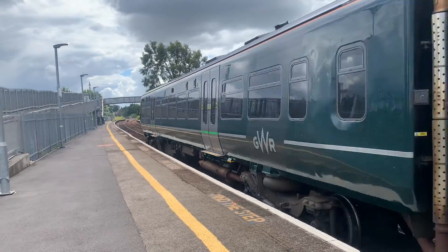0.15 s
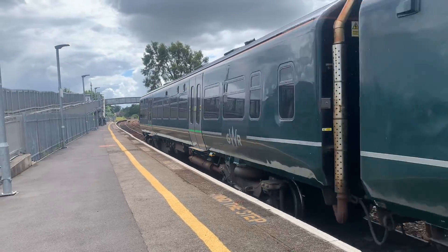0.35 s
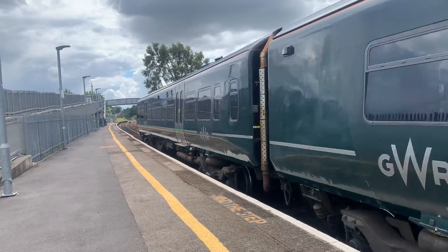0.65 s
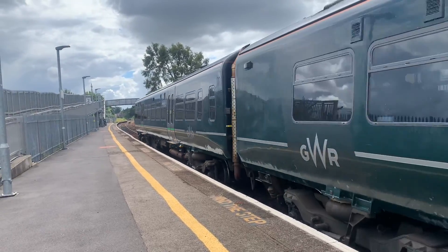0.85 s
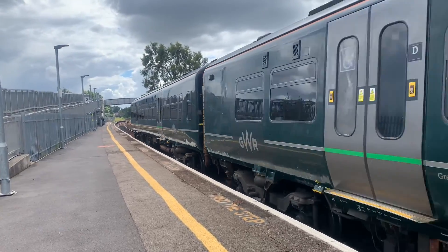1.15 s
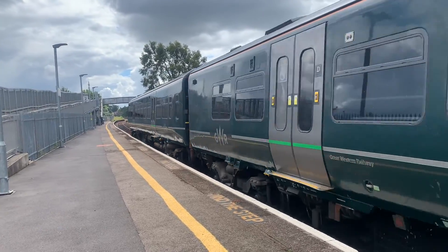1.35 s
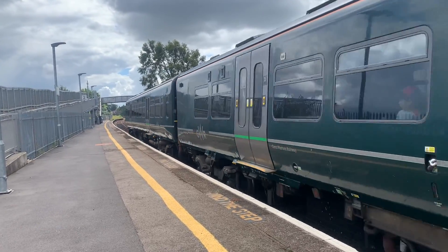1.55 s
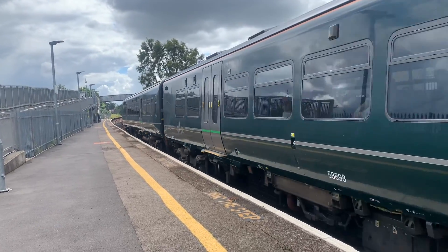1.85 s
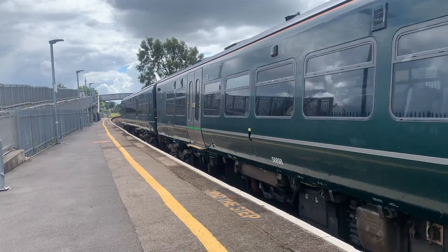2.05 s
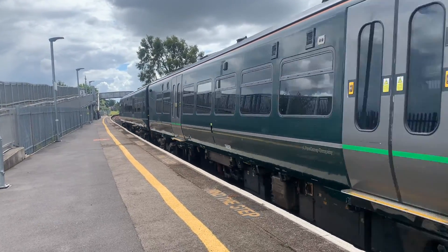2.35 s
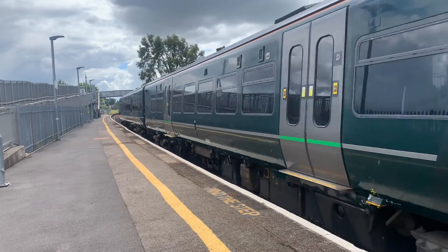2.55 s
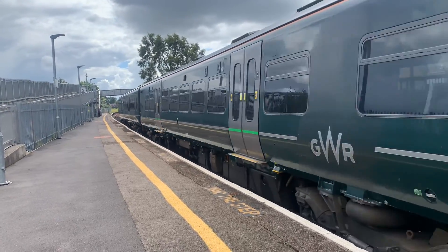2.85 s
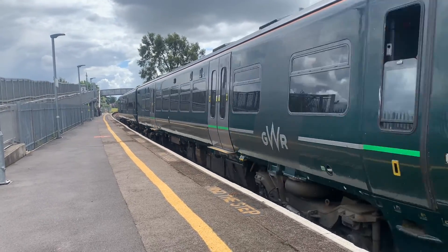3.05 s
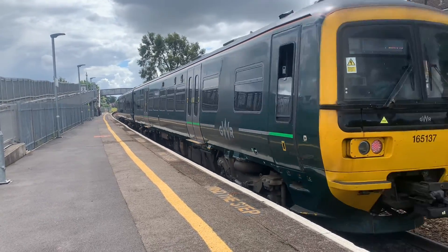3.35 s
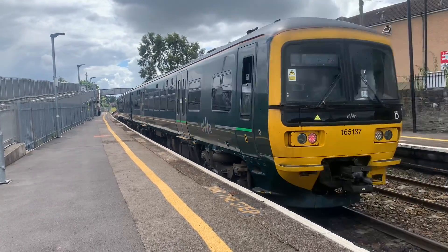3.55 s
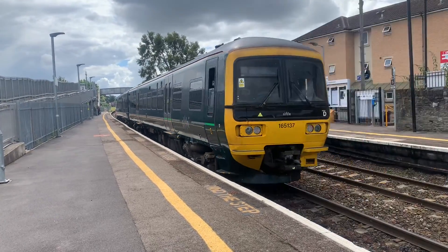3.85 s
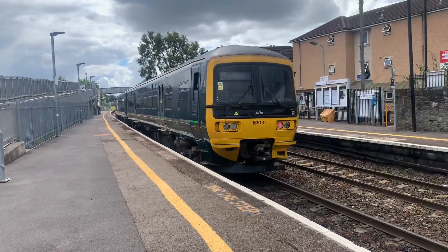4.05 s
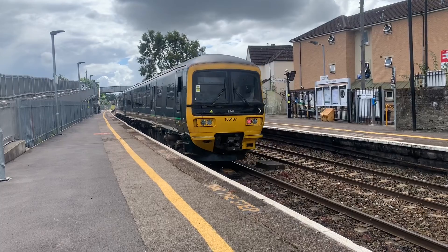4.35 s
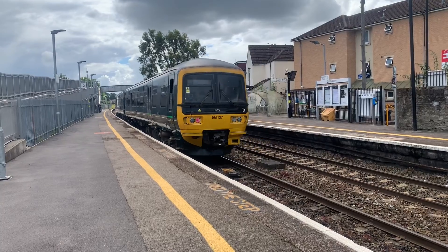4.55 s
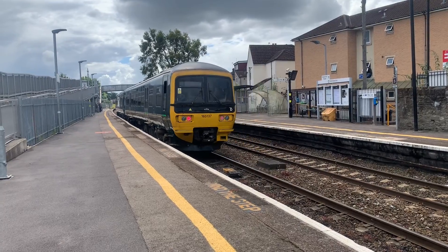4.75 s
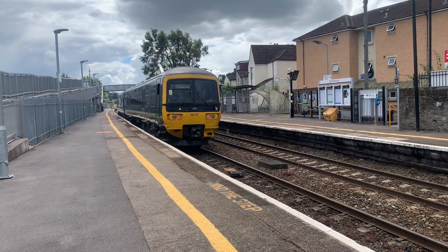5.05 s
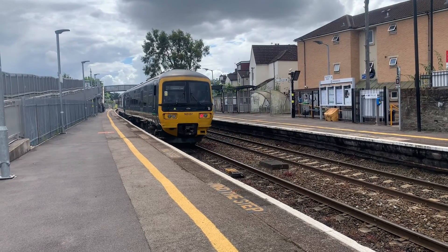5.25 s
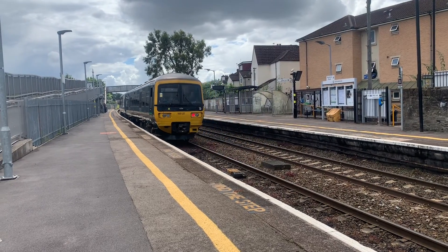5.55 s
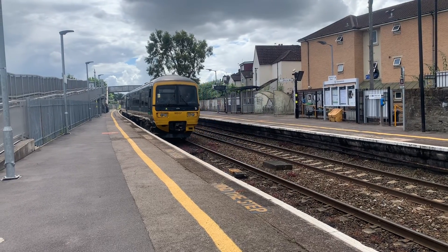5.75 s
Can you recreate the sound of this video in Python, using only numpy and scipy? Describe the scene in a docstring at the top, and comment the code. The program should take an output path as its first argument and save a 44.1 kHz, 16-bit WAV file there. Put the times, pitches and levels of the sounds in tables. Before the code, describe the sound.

About six seconds, outdoors on a station platform, stereo microphones very near the track. The train is already alongside at the start: a deep diesel drone around 40 and 80 Hz, beating slowly about every one and a half seconds, over low rumble, churning air and broadband wheel roar. From 0.8 s knocks and resonant wheel noise appear; at about 1.15 s cooling air roars, throbbing some forty times a second, with a dull thump and bright gritty spits. Around 1.3-1.6 s it peaks with a hard, rapid metallic clatter, its ring sinking in pitch, and a low slap of air. Sparser ticks continue to 2.7 s, with dull thumps near 2.35 and 2.6 s. A soft gust follows at 3 s. The train then recedes, drone and rolling noise steadily weaker and duller, with small wind bumps at 4.6, 5.0 and 5.3 s and a low gust near the end.

```python
"""A station platform: a diesel multiple unit runs through, close on the right of two microphones, and recedes.
Six-cylinder underfloor engines drone as beating partials; filtered noise gives rumble and wheel roar.
The last engine passes with throbbing cooling air and a hard clatter once a crank turn; running gear spits and thumps.
Sources swell and fade with distance; the air dulls the receding train and its wake buffets the microphones.
Table levels are those before the microphone ports add their resonance."""
import sys
import numpy as np
from scipy import signal
from scipy.fft import rfft, irfft, next_fast_len
from scipy.io import wavfile
from scipy.ndimage import uniform_filter1d

SR = 44100
rng = np.random.default_rng(int(sys.argv[2]) if len(sys.argv) > 2 else 0)


def unload_wav(signal):
    """Save mono or channel-first audio to the path in sys.argv[1] as 16-bit WAV at rate SR, clipped to [-1, 1]."""
    wavfile.write(
        sys.argv[1],
        SR,
        np.round(np.clip(np.atleast_2d(signal).T, -1, 1) * 32767).astype(np.int16),
    )


N = 259742  # samples
TIME = np.arange(N) / SR
# short-time frames for the two-microphone noise: 1024 samples long, 256 apart
FREQS = np.fft.rfftfreq(1024, 1 / SR)
FRAMES = np.arange(N // 256 + 5) * 256 / SR


def amp(db):
    """Decibels to gain."""
    return 10 ** (np.asarray(db) / 20)


def unit(x):
    """Scales to rms 1."""
    return x / np.sqrt(np.mean(x ** 2) + 1e-20)


def along(rows, t=TIME):
    """Reads a curve at the times t."""
    return np.interp(t, *np.transpose(rows))


def across(rows, hz=FREQS):
    """Reads a spectrum on a log-frequency axis."""
    f, value = np.transpose(rows)
    return np.interp(np.log(hz + 1), np.log(f), value)


def add(mix, s, sound):
    """Mixes a sound in at time s."""
    part = mix[max(round(s * SR), 0):][:len(sound)]
    part += sound[:len(part)]


def sweep(change, t=TIME):
    """A smooth S-shaped move from one value to another."""
    before, after, middle, half = change
    return before + (after - before) * (1 + np.tanh((t - middle) / half)) / 2


def passing(rows):
    """Gain of sources on a straight track: each falls off with distance, differently ahead and behind."""
    power = 0
    for s, db, passing_s, coming_db, going_db in rows:
        # passing_s is the nearest distance divided by the train speed
        doublings = np.log2(np.hypot(1, (TIME - s) / passing_s))
        fall_db = doublings * np.where(TIME < s, coming_db, going_db)
        power = power + amp(db - fall_db) ** 2
    return np.sqrt(power)


def drift(rate_hz):
    """Slow random motion of rms 1: noise with its fast part filtered away."""
    hz = np.fft.rfftfreq(N, 1 / SR)
    slow = rfft(rng.standard_normal(N)) / (1 + (hz / rate_hz) ** 4)
    return unit(irfft(slow, N))


def colour(x, spectrum, ripple_db=0):
    """Filters by a spectrum with steep ends; echoes under the cars cut a fine ripple into it."""
    hz = np.fft.rfftfreq(N, 1 / SR)
    low_end = np.minimum(hz / spectrum[0][0], 1) ** 3
    high_end = np.minimum(spectrum[-1][0] / (hz + 1), 1) ** 3
    ripple = unit(uniform_filter1d(rng.standard_normal(len(hz)), size=130))
    gain = amp(across(spectrum, hz) + ripple_db * ripple) * low_end * high_end
    return irfft(rfft(x) * gain, N)


# likeness of the two microphones for sound spread along the track: f/Hz, likeness (0-1)
SPREAD_LIKENESS = [(30, 0.66), (100, 0.9), (200, 0.85), (400, 0.58), (600, 0.63), (800, 0), (1100, 0.6),
                   (1400, 0.26), (1750, 0.8), (2500, 0), (4000, 0.58), (5000, 0.56), (6500, 0.42)]
# how far the left microphone leads for that sound: f/Hz, phase/rad
SPREAD_PHASE = [(100, 0.5), (250, -0.04), (450, 0.3), (750, 1), (1100, -0.6), (1750, -2.1), (2600, -0.55),
                (3500, -0.5), (4300, 1.6), (5000, 3), (6500, 0)]
# how much louder the left microphone is for that sound: f/Hz, level/dB
SPREAD_LEFT_DB = [(100, -2), (220, -1), (450, -1.8), (750, 0), (1100, 4), (1800, 1), (2600, 3), (4000, -1),
                  (7000, -2.5)]
# lead of the right microphone for the last engine: before/ms, after/ms, midpoint t/s, half duration/s
BEARING_LEAD_MS = (0.334, -0.049, 1.73, 0.44)


def air(direct, patchy_db):
    """White turbulence at two microphones: a share straight from the engine, the rest from all along the track."""
    shape = (3, len(FRAMES), len(FREQS))
    track, other, engine = rng.standard_normal(shape) + 1j * rng.standard_normal(shape)
    same = across(SPREAD_LIKENESS)
    lean = amp(across(SPREAD_LEFT_DB) / 2) * np.exp(.5j * across(SPREAD_PHASE))
    spread_left = track * lean
    spread_right = (same * track + np.sqrt(1 - same ** 2) * other) / lean
    # long waves take longer to bend round the microphones
    detour = 1 + 0.94 / (1 + (FREQS / 750) ** 2)
    lead_s = sweep(BEARING_LEAD_MS, FRAMES)[:, None] / 1000
    turn = np.exp(2j * np.pi * FREQS * detour * lead_s)
    spread, straight = np.array([spread_left, spread_right]), np.array([engine, engine * turn])
    z = np.sqrt(1 - direct) * spread + np.sqrt(direct) * straight
    # uneven patches in time and pitch, shared by both microphones
    patches = uniform_filter1d(rng.standard_normal(track.shape), size=10, axis=0)
    patches = unit(uniform_filter1d(patches, size=9, axis=1))
    z = z * amp(patchy_db * patches)
    noise = signal.istft(z, nperseg=1024, noverlap=768, time_axis=1, freq_axis=2)[1]
    return unit(noise[:, :N])


def ringing(modes):
    """Noise of rms 1 held in a few resonances."""
    hz = np.fft.rfftfreq(N, 1 / SR)
    power = sum(amp(db) ** 2 / (1 + ((hz - f) / width) ** 2) ** 2 for f, width, db in modes)
    noise = air(direct=0.19, patchy_db=3.0)
    return unit(irfft(rfft(noise) * np.sqrt(power), N))


def strike(hz, width_hz, t60, rise):
    """A blow on a cluster of close resonances: narrow noise that rises quickly and dies away."""
    t = np.arange(SR // 2) / SR
    gain = 1 / (1 + ((np.fft.rfftfreq(len(t), 1 / SR) - hz) / width_hz) ** 4)
    ring = irfft(rfft(rng.standard_normal(len(t))) * gain, len(t))
    fade = amp(-60 * t / t60) * (1 - np.exp(-t / rise))
    return unit(ring * fade) * np.sqrt(np.mean(fade ** 2))


# crankshaft speed as heard: t/s, f/Hz (turns a second)
CRANK_SPEED = [(0, 39.7), (1.2, 39.5), (1.8, 39.25), (3, 39.15), (5.89, 39.15)]


def crank_turns():
    """Crank angle in turns: the running sum of its speed, zero at 1.4535 s."""
    turns = np.cumsum(along(CRANK_SPEED)) / SR
    return turns - np.interp(1.4535, TIME, turns)


# partials of the exhaust drone: multiple of crank speed, relative level/dB
ENGINE_ORDERS = [(1, -6), (1.5, -8), (2, 0.9), (2.5, -13), (3, -10), (3.5, -20.5), (4.5, -22.5), (5, -19)]
# exhausts going by: t/s nearest, level/dB there, passing time/s, fall/dB per doubling coming, going
EXHAUST_PASSES = [(.25, -24.5, 0.77, -3, 6.95), (2.85, -35.5, 0.9, 5, 5.7)]
# hums of machinery under the cars: t/s abreast, passing time/s, f/Hz, level/dB
HUMS = [(0.4, 0.35, 197, -38), (1.05, 0.3, 171.5, -29.5), (1.3, 0.7, 359, -38.5), (1.3, 0.95, 33.7, -31.5),
        (2.5, 0.2, 319, -38), (2.75, 0.25, 231, -38), (3.4, 0.45, 315, -42.5)]
HUM_DOPPLER = 0.014  # share by which a hum is sharp while coming and flat while going
HUM_FALL_DB = 15  # per doubling of distance
# the beat: first crest, period, and strength of the weaker engine (0-1)
BEAT_CREST_S, BEAT_PERIOD_S, BEAT_SHARE = 0.19, 1.485, 0.27


def wavering_partial(turns):
    """A sine that wavers in level and phase as the paths under the cars change."""
    waver = amp(.3 * drift(3))
    wander = rng.random() + .012 * drift(2)
    return np.sqrt(2) * waver * np.sin(2 * np.pi * (turns + wander))


def drone():
    """Exhaust partials beat slowly, as two engines run slightly apart; machinery hums go by with Doppler shift."""
    turns = crank_turns()
    exhaust = sum(amp(db) * wavering_partial(order * turns) for order, db in ENGINE_ORDERS)
    beat_turns = (TIME - BEAT_CREST_S) / BEAT_PERIOD_S
    beat = abs(1 + BEAT_SHARE * np.exp(2j * np.pi * beat_turns))
    hums = 0
    for s, passing_s, hz, db in HUMS:
        heard_time = TIME - HUM_DOPPLER * np.hypot(TIME - s, passing_s)
        gain = passing([(s, db, passing_s, HUM_FALL_DB, HUM_FALL_DB)])
        hums = hums + gain * wavering_partial(hz * heard_time)
    return passing(EXHAUST_PASSES) * beat * exhaust + hums


# rumble of the cars: f/Hz, relative level/dB
RUMBLE_SPECTRUM = [(25, -14), (35, 4.5), (41, 5), (48, -5), (60, 4.5), (78, -3), (100, -0.5), (135, -1),
                   (235, -5.5), (400, -22.5), (1000, -21.5)]
# fade of the rumble: level/dB before, level/dB after, midpoint t/s, half duration/s
RUMBLE_FADE_DB = (-23.5, -39.5, 3, 2)
RUMBLE_LUMPS_DB, RUMBLE_LUMPS_HZ = 2, 1.46  # rms depth and rate of its random lumps
# wheels rolling on rail: f/Hz, relative level/dB
ROLL_SPECTRUM = [(60, 8), (200, -2), (370, 2), (700, -2.5), (1050, -5), (1400, -9.5), (1750, -5.5),
                 (2200, -8.5), (3100, -15), (4200, -17), (5600, -26), (7500, -26), (9500, -28),
                 (15000, -46)]
# share of rolling noise from the engine's side: before, after, midpoint t/s, half duration/s
ROLL_DIRECT = (0.47, 0.082, 1.83, 0.21)
# resonances of the rails: f/Hz, width/Hz, relative level/dB
RAIL_MODES = [(745, 22, -3), (966, 57, -2.5), (1220, 15, 2.5), (1328, 18, -20), (1675, 39, -3.5),
              (1970, 60, -12)]
RAIL_DB = -13  # against the wheel roar
# the wheels going by: t/s nearest, level/dB there, passing time/s, fall/dB per doubling coming, going
WHEEL_PASS = [(1.68, -28.5, 0.89, 2.7, 6.41)]


def rolling():
    """Low rumble of the cars, the roar of the wheels, and the rails singing faintly under them."""
    direct = sweep(ROLL_DIRECT, FRAMES)[:, None]
    rumble = unit(colour(air(direct, patchy_db=0.6), RUMBLE_SPECTRUM))
    rumble_db = sweep(RUMBLE_FADE_DB) + RUMBLE_LUMPS_DB * drift(RUMBLE_LUMPS_HZ)
    wheels = unit(colour(air(direct, patchy_db=2), ROLL_SPECTRUM, ripple_db=1.1))
    rails = amp(RAIL_DB) * ringing(RAIL_MODES)
    return rumble * amp(rumble_db) + (wheels + rails) * passing(WHEEL_PASS)


# cooling air: f/Hz, relative level/dB
FAN_SPECTRUM = [(80, -36), (170, 0.5), (360, 5.5), (620, -3), (980, 3.5), (1400, -4), (1800, -14),
                (2400, -21), (3100, -30), (4200, -28), (5800, -33.5), (15000, -45)]
# the fan going by: t/s nearest, level/dB there, passing time/s, fall/dB per doubling coming, going
FAN_PASS = [(1.15, -23, 0.33, 5, 8.8)]
# air forced through the radiator grille: f/Hz, relative level/dB
GRILLE_SPECTRUM = [(450, -20), (680, -3), (800, -2), (980, -1), (1150, 2), (1400, -18)]
# the grille going by: t/s nearest, level/dB there, passing time/s, fall/dB per doubling coming, going
GRILLE_PASS = [(1.3, -28.5, 0.08, 11, 11)]


def fan():
    """Cooling air roars mostly from the moving engine, throbs with the crank and surges as the grille goes by."""
    throb = 1 + 0.32 * np.cos(2 * np.pi * (crank_turns() - .25))
    roar = unit(colour(air(direct=0.94, patchy_db=0.0), FAN_SPECTRUM, ripple_db=0.85))
    surge = unit(colour(air(direct=0.59, patchy_db=3), GRILLE_SPECTRUM, ripple_db=6.0))
    return (roar * passing(FAN_PASS) + surge * passing(GRILLE_PASS)) * throb


# bright spits of the running gear: t/s, level/dB, time/s to fall 60 dB
SPITS = [(0.139, -37, 0.16), (1.155, -29, 0.07), (1.255, -28, 0.047), (1.306, -30.5, 0.049),
         (1.406, -30, 0.058), (1.558, -37, 0.072), (1.577, -31, 0.07), (2.042, -32, 0.066)]
# their colour: f/Hz, relative level/dB
SPIT_SPECTRUM = [(2000, -28), (5000, -6), (7000, -7), (9500, -2), (12000, -8), (15500, -8)]
# dull thumps of the bogies: t/s, level/dB, f/Hz, time/s to fall 60 dB
THUMPS = [(1.172, -18, 156, 0.4), (2.344, -20, 133, 0.26), (2.605, -17, 127, 0.14)]


def running_gear():
    """Short gritty noise spits and a few low struck thumps from under the train."""
    spits, thumps, t = np.zeros(N), np.zeros(N), np.arange(SR // 3) / SR
    for s, db, t60 in SPITS:
        add(spits, s, amp(db - 60 * t / t60) * (1 - np.exp(-t / 0.0022)))
    for s, db, hz, t60 in THUMPS:
        add(thumps, s, amp(db) * strike(hz, width_hz=0.22 * hz, t60=t60, rise=0.0057))
    grit = unit(amp(2.5 * drift(700)))
    noise = unit(colour(air(direct=0.28, patchy_db=3.0), SPIT_SPECTRUM))
    return spits * grit * noise + thumps


# air churning under the cars: f/Hz, relative level/dB
CHURN_SPECTRUM = [(85, -8), (130, 0), (175, -2.5), (225, -2), (280, -12), (400, -12), (700, -24)]
# churning spots going by: t/s nearest, level/dB there, passing time/s, fall/dB per doubling coming, going
CHURN_PASSES = [(0.22, -26.5, 0.09, 14, 14), (0.95, -30, 0.14, 14, 12), (2.31, -27, 0.12, 12, 18),
                (2.64, -29.5, 0.07, 18, 12)]


def slipstream():
    """Rough low churning of the air dragged along by the bogies and the boxes under the floor."""
    churn = unit(colour(air(direct=0.5, patchy_db=3), CHURN_SPECTRUM))
    return passing(CHURN_PASSES) * churn


RATTLE_PER_S, RATTLE_SPAN = 1000, 1.4  # mean clicks a second; ratio of their spread above and below the pitch


def rattle(hz, t60):
    """Chatter: a fast run of tiny band-passed clicks round one pitch, uneven in size and dying away."""
    t = np.arange(SR // 2) / SR
    clicks = (rng.random(len(t)) < RATTLE_PER_S / SR) * rng.uniform(-0.39, 1, len(t))
    clicks[0] = 1
    band = (hz / RATTLE_SPAN, hz * RATTLE_SPAN)
    tick = signal.butter(2, band, "bandpass", fs=SR, output="sos")
    run = signal.sosfilt(tick, clicks * amp(-60 * t / t60))
    return run / abs(run).max()


# short knocks and clicks heard as the train passes:
# t/s, reference level/dB, ring f/Hz, ring width/Hz, time/s to fall 60 dB
KNOCKS = [(0.857, -19, 1000, 550, 0.022), (1.031, -23, 2200, 300, 0.066), (1.076, -33, 5080, 220, 0.093),
          (1.100, -25, 5070, 200, .11), (1.128, -32, 5000, 120, .09), (1.153, -30, 4710, 130, .11),
          (1.3025, -17, 3460, 250, 0.045), (1.328, -29, 4410, 250, .09), (1.354, -29, 6400, 400, .06),
          (1.378, -26, 4050, 650, .06), (1.405, -29, 3960, 800, 0.06), (1.431, -27, 3800, 500, .06),
          (1.453, -17, 3880, 850, 0.065), (1.4795, -21, 4160, 600, .085), (1.504, -19, 3900, 500, 0.065),
          (1.531, -19, 3700, 550, 0.049), (1.609, -27, 4370, 180, 0.1), (1.764, -29, 1900, 450, 0.036),
          (1.914, -24, 3530, 150, 0.054), (1.987, -31, 4610, 220, .08), (2.016, -32, 4700, 120, 0.074),
          (2.088, -35, 4500, 180, .06), (2.167, -35, 4690, 150, 0.066), (2.191, -37, 4380, 120, .07),
          (2.216, -26, 4140, 550, .09), (2.345, -31, 4050, 300, 0.07), (2.425, -28, 4040, 300, .08),
          (2.578, -28, 4620, 200, 0.15), (2.678, -36, 3600, 200, .06), (2.729, -28, 3750, 500, .06)]
KNOCK_RING_DB, RATTLE_DB = -11, -5  # ring and chatter against the reference level
KNOCK_RIGHT_DB = -1  # right microphone against the left


def knocks():
    """Short knocks and clicks as the train passes: a rattle of ticks with a brief ring of narrow noise."""
    left, right = np.zeros((2, N))
    for s, db, hz, width_hz, t60 in KNOCKS:
        ring = amp(db + KNOCK_RING_DB) * strike(hz, width_hz=width_hz, t60=t60, rise=0.00059)
        knock = ring + amp(db + RATTLE_DB) * rattle(hz, t60)
        # the same lead between the microphones as the passing engine has
        add(left, s + sweep(BEARING_LEAD_MS, s) / 1000, knock)
        add(right, s, amp(KNOCK_RIGHT_DB) * knock)
    return np.array([left, right])


# resonances of the wheels of the nearest bogie: f/Hz, width/Hz, relative level/dB
WHEEL_MODES = [(2100, 300, 4.5), (2620, 290, 3)]
# that bogie going by: t/s nearest, level/dB there, passing time/s, fall/dB per doubling coming, going
BOGIE_PASS = [(.9, -37, 0.23, 14, 11)]


def near_bogie():
    """The wheels of one bogie sing out as resonant noise when they pass the microphones."""
    return passing(BOGIE_PASS) * ringing(WHEEL_MODES)


# mechanical hiss of the engine and its drive: f/Hz, relative level/dB
CLATTER_SPECTRUM = [(300, 0), (900, 2), (2000, -1.5), (3000, -9), (4600, -10), (5600, -12.5), (7300, -22),
                    (9400, -13.5), (11500, -18.5), (15000, -23.5)]
# what the bursts ring in the block: f/Hz, width/Hz, relative level/dB
BLOCK = [(3520, 430, 3), (4530, 250, -3.5), (6350, 200, -5.5), (10100, 3500, -14.5)]
# hiss going by: t/s nearest, level/dB there, passing time/s, fall/dB per doubling coming, going
HISS_PASSES = [(1.45, -29, 0.37, 14.4, 7.7), (2.6, -40, 0.39, 13, 9.3)]
# block going by: t/s nearest, level/dB there, passing time/s, fall/dB per doubling coming, going
BLOCK_PASSES = [(1.47, -37, 0.092, 4.1, 11), (2.25, -48, 0.81, 23, 13.4)]
# narrow ring going by: t/s nearest, level/dB there, passing time/s, fall/dB per doubling coming, going
RING_PASSES = [(1.0, -48, 0.2, 22, 16), (2.15, -51, 0.48, 18, 13)]
# centre pitch of the narrow ring: f/Hz before, f/Hz after, midpoint t/s, half duration/s
RING_GLIDE_HZ = (4950, 3700, 1.3, 0.23)
# rms scatter of that pitch from burst to burst: f/Hz before, f/Hz after, midpoint t/s, half duration/s
RING_SCATTER_HZ = (99, 230, 1.9, 0.264)


def clatter():
    """Each crank turn brings a burst that rings the block, over a hiss that pulses with the firings."""
    turns = crank_turns()
    turn = np.floor(turns - turns[0] // 1).astype(int)
    phase = turns % 1
    # a four-stroke cycle spans two turns, so strong and weak bursts tend to alternate
    uneven_db = 1.5 * rng.standard_normal(turn[-1] + 1)[turn]
    alternate_db = .8 * np.cos(np.pi * np.floor(turns))
    strength = amp(uneven_db + alternate_db)
    burst = unit(strength * np.exp(-phase / .36) * (1 - np.exp(-phase / .07)))
    firing = np.exp(-(3 * turns % 1) / 0.37)  # six cylinders: three firings a turn
    hiss = unit(colour(air(direct=0.23, patchy_db=2.5), CLATTER_SPECTRUM, ripple_db=2.06))
    hiss *= passing(HISS_PASSES) * unit(1 + 0.3 * burst + 0.15 * firing)
    left_right = amp([[-1.0], [1.0]])
    block = passing(BLOCK_PASSES) * ringing(BLOCK) * left_right
    # the same bursts excite a narrow ring that sinks as it passes, each at a pitch of its own
    spread = np.sqrt(3) * rng.uniform(-1, 1, turn[-1] + 1)[turn]
    ring_hz = sweep(RING_GLIDE_HZ) + sweep(RING_SCATTER_HZ) * spread
    angle = 2 * np.pi * np.cumsum(ring_hz) / SR
    ring = np.array([drift(230) * np.cos(angle) + drift(230) * np.sin(angle) for _ in range(2)])
    return hiss + burst * (block + passing(RING_PASSES) * ring)


# slaps of the slipstream on the microphones: t/s, level/dB, starting f/Hz, time/s to fall 60 dB
BUFFETS = [(1.547, -8, 73, 0.12), (4.563, -15, 220, 0.051), (5.009, -5, 90, 0.039), (5.268, -20, 219, 0.03)]
BUFFET_SAG = 1  # fall of their pitch over the decay time, as a natural logarithm


def buffets():
    """Eddies slap the microphones: a few cycles of pressure whose pitch sinks as they die."""
    out, t = np.zeros(N), np.arange(SR // 4) / SR
    for s, db, hz, t60 in BUFFETS:
        sinking_hz = hz * np.exp(-BUFFET_SAG * np.minimum(t / t60, 1))
        turns = np.cumsum(sinking_hz) / SR
        rise = 1 - np.exp(-(t * hz / 0.68) ** 2)
        add(out, s, amp(db - 60 * t / t60) * rise * np.sin(2 * np.pi * turns))
    return out


# gusts of the train's wake on the microphones: t/s strongest, half duration/s, level/dB
GUSTS = [(2.996, 0.16, -31.5), (3.555, 0.16, -39), (5.3, 0.57, -33)]
# their colour: f/Hz, relative level/dB
WAKE_SPECTRUM = [(30, -12), (40, -1), (60, -5), (80, -12), (130, -13), (200, -18)]


def wake():
    """Low gusts that follow the last car: filtered turbulence under bell-shaped swells."""
    gust = sum(amp(db) * np.exp(-((TIME - s) / half_s) ** 2) for s, half_s, db in GUSTS)
    return gust * unit(colour(air(direct=0.4, patchy_db=2.0), WAKE_SPECTRUM))


# loss per second of travel, at the reference pitch, once the last engine is by
AIR_LOSS_DB_PER_S, AIR_LOSS_HZ, RECEDING_S = 2, 11000, 3.5


def recede(x):
    """Air takes away the treble, more with distance and with the square of the pitch."""
    hz, t, z = signal.stft(x, SR, nperseg=512)
    travel_s = np.maximum(t - RECEDING_S, 0)
    loss_db = AIR_LOSS_DB_PER_S * travel_s * (hz[:, None] / AIR_LOSS_HZ) ** 2
    return signal.istft(z * amp(-loss_db), SR, nperseg=512)[1][:, :N]


def scene():
    """The whole train, dulled by the air as it recedes, and the air behind it."""
    train = drone() + rolling() + fan() + running_gear()
    train = train + slipstream() + knocks() + near_bogie() + clatter()
    return recede(train) + buffets() + wake()


# resonances of the microphone ports: f/Hz, width/Hz, level/dB
PORTS = [(4704, 250, 7), (9600, 860, 0)]
TREBLE_LEAD = 13  # samples by which the right channel leads in the shared treble
EDGE_HZ = 15700  # middle of the upper band edge


def record(dry):
    """The ports ring; the channels merge from 7.3 to 8.9 kHz, the right early; then a low cut and band limit."""
    size = next_fast_len(N + SR, real=True)
    hz = np.fft.rfftfreq(size, 1 / SR)
    port_db = sum(db / (1 + ((hz - f) / width) ** 2) for f, width, db in PORTS)
    left, right = rfft(dry, size) * amp(port_db)
    blend = np.pi / 2 * np.clip((hz - 7300) / 1600, 0, 1)
    early_left = left * np.exp(2j * np.pi * hz * TREBLE_LEAD / SR)
    right = np.cos(blend) * right + np.sin(blend) * early_left
    low_cut = 1 - 1 / (1 + (hz / 29) ** 12)
    band = np.clip((EDGE_HZ - hz) / 200 + .5, 0, 1)
    return irfft(np.array([left, right]) * low_cut * band, size)[:, :N]


dry = scene()
out = record(dry)
unload_wav(out)
```